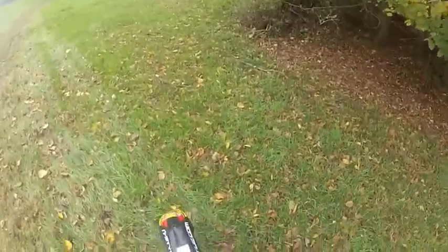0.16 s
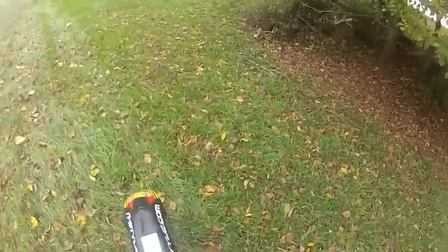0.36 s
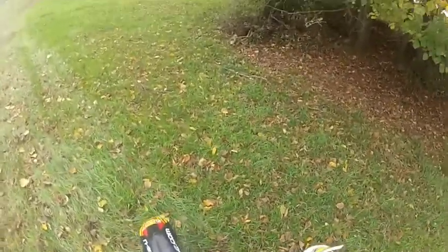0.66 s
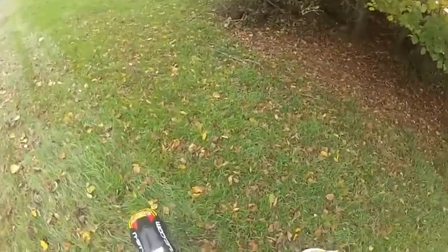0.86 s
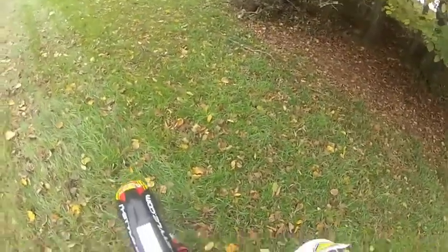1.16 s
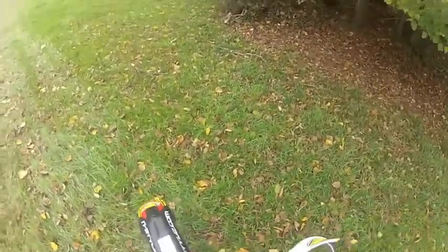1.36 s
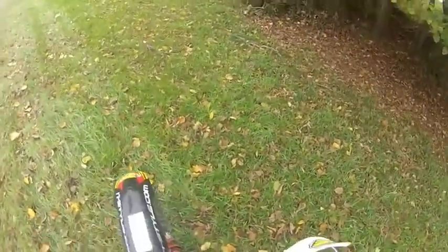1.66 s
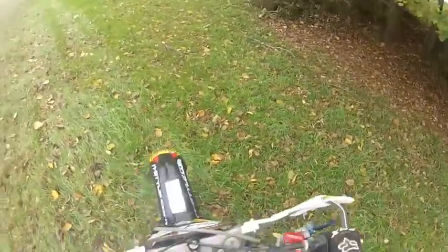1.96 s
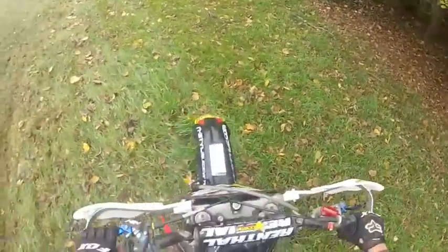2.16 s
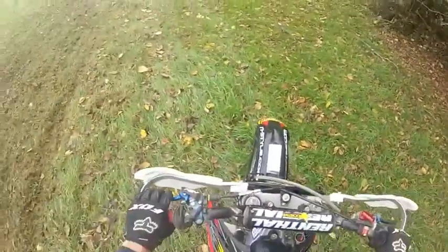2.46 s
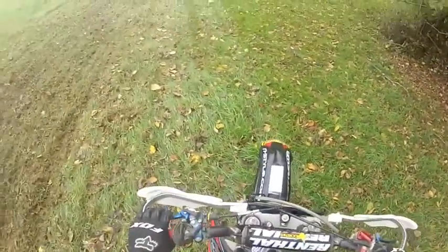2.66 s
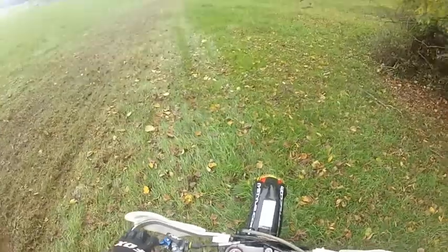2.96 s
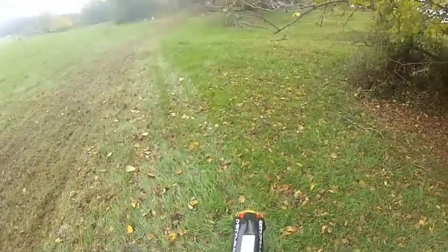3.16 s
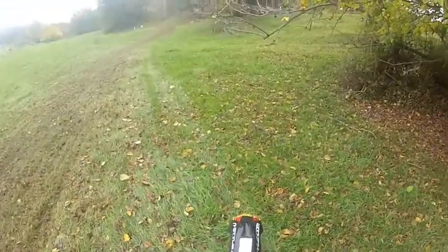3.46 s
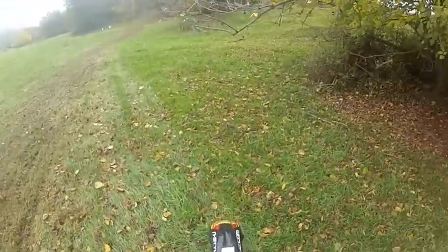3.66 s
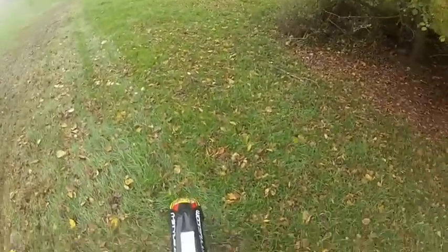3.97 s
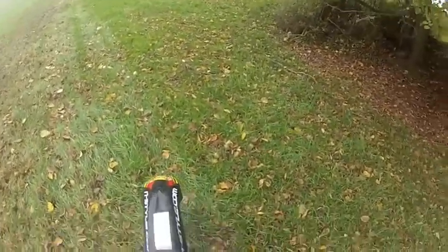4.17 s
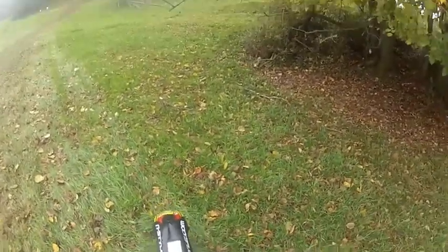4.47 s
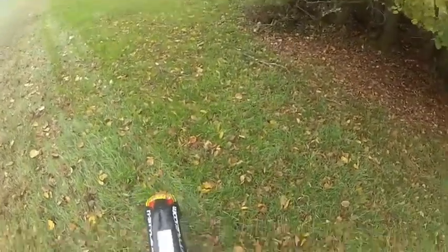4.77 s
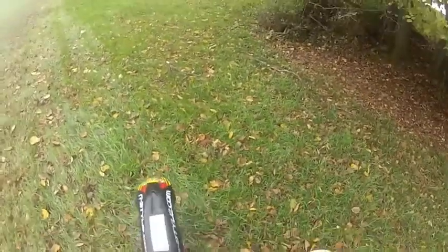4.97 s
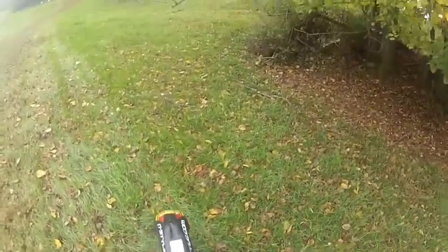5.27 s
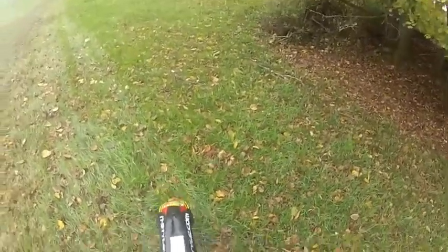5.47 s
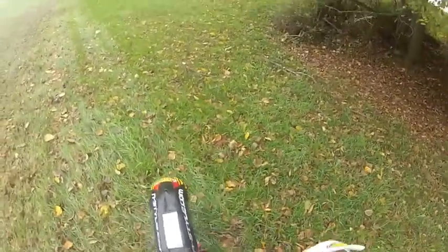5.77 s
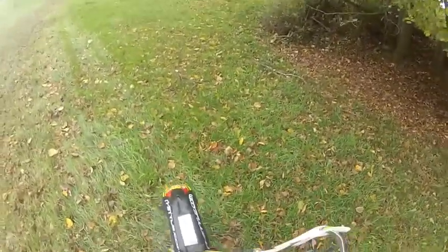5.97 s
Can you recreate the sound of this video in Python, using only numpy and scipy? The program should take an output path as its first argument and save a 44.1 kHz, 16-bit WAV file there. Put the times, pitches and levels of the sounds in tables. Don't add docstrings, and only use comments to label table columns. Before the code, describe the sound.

A rider on a dirt bike in a quiet field works at kick-starting it, and the engine never catches. Two early bursts of plastic knocks, thumps and low rumble are separated by stray bumps and a deep hollow tank boom. After a near-silent pause, three more rattling bursts follow. Short strap scrapes tick throughout. The microphone is sealed in a case on the helmet, sounding close, boxy and gritty.

```python
import sys
import numpy as np
from scipy import signal
from scipy.io import wavfile
from scipy.ndimage import uniform_filter1d

SR = 44100
rng = np.random.default_rng(int(sys.argv[2]) if len(sys.argv) > 2 else 0)


def digitize_waveform(pressure):
    field = np.atleast_2d(pressure).T
    bounded = np.clip(field, -1, 1)
    quanta = np.round(bounded * 32767).astype(np.int16)
    wavfile.write(sys.argv[1], SR, quanta)


def natural_amplitude(level_db):
    exponent = np.asarray(level_db, float) / 20
    return 10 ** exponent


N = 269892

# centre in Hz, width in Hz, level in dB.
AIR_MODES = [(460, 300, -9), (930, 250, -11), (1290, 200, 0), (1750, 400, -6), (2280, 300, -3),
             (3050, 330, -7), (3650, 550, -6), (4700, 900, -18), (5700, 1200, -23)]
# centre in Hz, width in Hz, level in dB.
CASE_LOW = [(576, 70, -1), (670, 75, -2), (890, 120, -8), (1200, 230, 0), (1370, 130, -5)]
CASE_MID = [(1790, 240, 0), (2320, 330, -3), (2750, 400, -17)]
CASE_TOP = [(3175, 510, 11.5), (3612, 268, 14.5), (4300, 81, -33), (4620, 1360, -1), (5010, 1600, 0.5)]
# centre in Hz, width in Hz, level in dB.
THUMP_MODES = [(97.2, 67, 1.5), (160.6, 43.5, 4), (279.1, 43, -2), (388, 42, -11)]
# centre in Hz, width in Hz, level in dB.
RUMBLE_MODES = [(137.6, 48, 3), (187, 56, -9), (265, 53, -4), (407, 42, -18.5)]
# centre in Hz, width in Hz, level in dB.
STRAP_MODES = [(5215, 530, -1.5), (5214, 3800, 3)]
STRAP_CASE_MODES = [(1900, 180, -9), (2220, 600, 1), (3020, 600, -4), (3630, 510, -3)]

# levels in dB of sway, hum and rumble.
REST_DB = (-58, -54, -60)
# peak time in seconds, effort in dB, build-up in seconds,
# settling in seconds, heaviness (sway over rumble) in dB.
KICKS = [
    (.47, -29.5, .3, .1, 5.5),
    (1.84, -32.5, 0.41, 0.087, 8),
    (4.25, -31.5, 0.35, .1, 4),
    (5.06, -31.5, 0.36, 0.13, 6.5),
    (5.8, -32, 0.39, 0.094, 6.5),
]
SHIFTS = [(.105, -49.5, 0.081, 0.094, -8), (.2, -57, 0.12, 0.084, 0), (.525, -39.5, 0.099, 0.13, -3.5),
          (.7, -46, 0.3, 0.23, -3.5), (.84, -41.5, 0.027, 0.093, -5.5), (.99, -36, 0.2, 0.35, 2),
          (1.146, -27.5, 0.097, 0.15, 4), (1.93, -38.5, 0.037, 0.16, 6), (2.1, -43, .05, 0.16, 11.5),
          (2.73, -52, .03, 0.28, -4), (2.87, -49, 0.071, 0.085, -6), (3.13, -61, .05, 0.059, 19),
          (3.49, -49, 0.19, 0.25, -6.5), (3.68, -42, 0.24, 0.45, -2), (3.86, -40.5, 0.11, 0.19, -5.5),
          (4.34, -34, 0.09, 0.35, 5), (4.53, -47, 0.17, 0.21, -4.5), (4.65, -40.5, 0.15, 0.16, -5.5),
          (5.13, -40, 0.043, .14, -1), (5.45, -54, 0.24, 0.26, -1), (6.1, -54, .05, .1, -1)]
# start in seconds, peak in dB, share heard through the case in dB, length in ms.
SCRAPES = [(0.0453, -64.5, 16, 40), (0.1357, -47.5, -8, 10), (0.144, -57, 1, 18), (0.2668, -44, -3.5, 15.4),
           (0.413, -54, 10, 12), (0.4495, -36, 10, 13.6), (0.855, -46, -7, 15.5), (0.922, -60, 2, 23),
           (0.9462, -45, -7.5, 14.5), (1.0305, -49, 0, 21), (1.127, -36.5, 8, 12), (1.4571, -40, -3, 4.7),
           (1.493, -54.5, 13, 10), (1.5813, -43, -10, 6.6), (1.6027, -61.5, 9, 12), (1.7873, -38, 8, 23.5),
           (3.8935, -54, 5.5, 42), (4.0407, -46, -3.5, 24.5), (4.2218, -36.5, 9, 4.6),
           (4.2732, -58, 10, 24), (4.796, -46, -6, 26), (4.999, -39, 3, 18), (5.108, -49, -4, 9),
           (5.2864, -54, -8, 12), (5.3916, -54.5, -2, 26), (5.5413, -42.5, -8.5, 20), (5.7414, -33, 7, 9.8),
           (5.9315, -44, -4.5, 10.5), (6.0247, -57, -4, 12)]
# start in seconds, peak in dB, dullness in dB, contact length in ms.
KICK_RATTLE = [(0.3429, -10, -7, 2.4), (0.3855, -6.5, -9.5, 0.77), (0.4233, -23, -0.5, 3.7),
               (0.4525, -18.5, -5.5, 0.71), (1.6597, -20, -2.5, 6.3), (1.6919, -19.5, -5, 0.77),
               (1.7155, -26, -5.5, 2.3), (1.7252, -8.5, -6, 4), (1.7639, -21.5, 2.5, 2.7),
               (1.7967, -15.5, -6.5, 2.1), (1.8273, -20, 3, 1.5), (1.8387, -8, -6, 3.4),
               (1.8754, -14.5, -7, 5.3), (1.906, -34.5, -0.5, 8.2),
               (4.0774, -19.5, -4.5, 7.2), (4.1187, -13.5, -6, 2.1), (4.151, -15, 0.5, 0.33),
               (4.164, -9.5, -8.5, 1.8), (4.2148, -29, 0, 0.64), (4.2249, -20.5, -4, 18.6),
               (4.2803, -29, 0, 0.94), (4.3233, -29, 2.5, 1.1), (4.8638, -13.5, -2, 4),
               (4.8918, -5.5, -7, 2.6), (4.9349, -8.5, -7.5, 3.4), (4.9619, -19, 4, 2.3),
               (4.983, -12, -6, 4.8), (5.0006, -16, -20, 2), (5.025, -20, 0, 3.8), (5.052, -16, -6, 1.05),
               (5.6225, -17, -5.5, 4.7), (5.6798, -9.5, -8.5, 2.8), (5.7042, -23, 6, 5),
               (5.742, -16.5, -6.5, 6.1), (5.7689, -13.5, -1, 3.6), (5.7902, -13.5, -6.5, 0.92)]
# start in seconds, peak in dB, dullness in dB, contact length in ms,
# weight behind it in dB.
BUMPS = [(0.0829, -28, -5.5, 4.4, -18), (0.6118, -43.5, -4.5, 2.8, 9.5), (0.837, -32.5, -1, 1.1, -4.5),
         (1.0091, -36, -22, 5.6, 3), (1.0224, -20.5, -7, 2.6, 1), (1.108, -39, -10, 16, 15),
         (1.1278, -26.5, -24, 11, 13), (1.202, -33.5, 1, 2.9, -3), (1.234, -24, -1, 2.5, 1.5),
         (1.2558, -32.5, -3.5, 8.1, 2), (1.311, -10.5, -7, 1.9, -31), (1.3465, -34, -4.5, 7.1, 4.5),
         (1.508, -28.5, -0.5, 0.33, 1), (2.0967, -25.5, -7, 2.2, 0), (2.2042, -43, -4.5, 2.7, 6),
         (2.4212, -46, -4.5, 4.3, 5), (2.6518, -34, -0.5, 3.5, -37), (2.7226, -31, -5, 3.8, -2.5),
         (2.829, -43.5, -4.5, 4.7, 0.5), (2.857, -39.5, -16, 27, 4), (3.8644, -30, -0.5, 3.7, -4.5),
         (4.6428, -27, -2, 5.7, -1), (5.4335, -37, 3, 11, 2), (6.0955, -50.5, 8.5, 2.4, 1)]
# start in seconds, low mode in dB, high mode in dB, T60 of the low mode in seconds.
BOOMS = [
    (1.3152, -6, -7.5, .3),
    (1.3600, -18, -30, .3),
    (1.463, -16, -18, .25),
    (1.517, -22, -26, .25),
]


def level(x, db):
    return x * natural_amplitude(db) / np.sqrt(np.mean(x ** 2))


def ring(x, peaks):
    out = 0
    for hz, width, db in peaks:
        b, a = signal.iirpeak(hz, hz / width, SR)
        once = signal.lfilter(b, a, x)
        out = out + natural_amplitude(db) * signal.lfilter(b, a, once)
    return out


def struck(x, peaks):
    total = 0
    for hz, width, db in peaks:
        mode = ring(x, [(hz, width, db)])
        total = total + natural_amplitude(db) * mode / np.abs(mode).max()
    return total / np.abs(total).max()


def walk(rate):
    k = int(SR / rate)
    steps = np.repeat(rng.standard_normal(N // k + 1), k)
    return uniform_filter1d(steps, k)[:N]


def add(track, s, burst):
    i = int(s * SR)
    track[i:i + len(burst)] += burst[:N - i]


def air():
    bands = 0
    for peak in AIR_MODES:
        noise = rng.standard_normal(N)
        bands = bands + natural_amplitude(1.5 * walk(6)) * ring(noise, [peak])
    return level(bands, -58)


def moves():
    slope_db, hum_against_effort_db = 28.5, -7
    t = np.arange(0, N, 32) / SR
    power = np.array([natural_amplitude(2 * (db + 3 * walk(8)[::32])) for db in REST_DB])
    for rows, bend in ((KICKS, 2.5), (SHIFTS, 1.2)):
        for s, db, rise_s, fall_s, heavy_db in rows:
            away = np.where(t < s, (s - t) / rise_s, (t - s) / fall_s)
            swing_db = db - slope_db * away ** (0.54 * bend)
            hold_db = db - slope_db * away ** bend
            move_db = [swing_db + heavy_db, hold_db + hum_against_effort_db, hold_db - heavy_db - 1.5]
            power += natural_amplitude(2 * np.array(move_db))
    return [np.interp(np.arange(N) / SR, t, db) for db in 10 * np.log10(power)]


def body():
    sway_db, hum_db, rumble_db = moves()
    sway_noise, hum_noise, rumble_noise, tick_noise = rng.standard_normal((4, N))
    ticks = tick_noise * natural_amplitude(2.4 * walk(150))
    rattle = ring(ticks, CASE_LOW) + natural_amplitude(-9) * ring(ticks, CASE_MID) + natural_amplitude(-16) * ring(ticks, CASE_TOP)
    rumble = level(ring(rumble_noise, RUMBLE_MODES), -2) * natural_amplitude(2.5 * walk(30))
    shaken = rumble + level(rattle, -10)
    sway = ring(sway_noise, [(34.7, 24, -0.5), (60.5, 51, -12.0)])
    hum = ring(hum_noise, [(92.0, 28.5, 0)])
    return level(sway, -1.6) * natural_amplitude(sway_db) + level(hum, -3.2) * natural_amplitude(hum_db) + shaken * natural_amplitude(rumble_db)


def scrapes():
    t = np.arange(2048) / SR
    thin, rasp = np.zeros((2, N))
    for s, db, case_db, ms in SCRAPES:
        noise, slip = rng.standard_normal((2, len(t)))
        share = t / (.001 * ms)
        grain = noise * natural_amplitude(db + 20. * uniform_filter1d(slip, size=40))
        slipping = grain * np.exp(-.6 * share) / (1 + share ** 6)
        add(thin, s, slipping)
        add(rasp, s, natural_amplitude(min(case_db, 6) + 5.5) * slipping)
    return natural_amplitude(11) * ring(thin, STRAP_MODES) + natural_amplitude(14) * ring(rasp, STRAP_CASE_MODES)


def knocks():
    t = np.arange(4096) / SR
    fade = np.cos(np.pi / 2 * t / t[-1])
    out = np.zeros(N)
    for s, db, low_db, ms, *weight_db in sorted(KICK_RATTLE + BUMPS):
        rough, soft, loose = rng.standard_normal((3, len(t)))
        thump_db = -7 + 0.78 * db + low_db + sum(weight_db)
        top_db = -19 - 0.044 * db - 0.13 * low_db
        decay_s = .001 * max(ms, .3)
        chatter = natural_amplitude(-29.0 + 69.0 * uniform_filter1d(loose, size=128)) * np.exp(-t / 0.018)
        contact = rough * (np.exp(-t / decay_s) + chatter)
        flex = rough * (np.exp(-t / (2.6 * decay_s)) + natural_amplitude(13.5) * chatter)
        mid, top = struck(contact, CASE_MID), struck(contact, CASE_TOP)
        low = ring(flex, CASE_LOW)
        low = low / np.abs(low).max()
        knock = mid + natural_amplitude(low_db + 0.5) * low + natural_amplitude(top_db + 7) * top
        push = soft * np.exp(-t / 0.0076)
        add(out, s - .0012, fade * natural_amplitude(db) * knock)
        add(out, s, fade * level(ring(push, THUMP_MODES), thump_db - 9.5))
    return out


def booms():
    t = np.arange(SR) / SR
    low = np.sin(2 * np.pi * 91.5 * t)
    high = np.sin(2 * np.pi * 138 * t) * 1000. ** (-t / .14)
    rock = natural_amplitude(-38.0) * np.sin(2 * np.pi * 45 * t) * 1000. ** (-t / 0.28)
    out = np.zeros(N)
    for s, low_db, high_db, t60 in BOOMS:
        tone = natural_amplitude(low_db) * (low * 1000. ** (-t / t60) + rock) + natural_amplitude(high_db) * high
        add(out, s, tone * (1 - np.exp(-t / 0.00097)))
    tank = signal.butter(2, [50.4, 332], "band", fs=SR, output="sos")
    return signal.sosfiltfilt(tank, out)


def scene():
    return (air() + body() + scrapes() + knocks() + booms())[None]


def low_pass(x):
    return signal.sosfilt(signal.butter(12, 16480, fs=SR, output="sos"), x)


def record(dry):
    guard = signal.butter(8, 5650, fs=SR, output="sos")
    mic_low = signal.butter(2, 27.8, "high", fs=SR, output="sos")
    heard = signal.sosfilt(np.vstack([guard, mic_low]), dry)
    coarse = signal.resample_poly(heard, 40, 147, axis=1)
    steps = np.repeat(coarse, 4, axis=1)
    held = signal.resample_poly(steps, 147, 160, axis=1)[:, :N]
    mix = signal.sosfilt(signal.butter(24, 15150, fs=SR, output="sos"), held)
    return low_pass(mix)


dry = scene()
out = record(dry)
digitize_waveform(out)
```